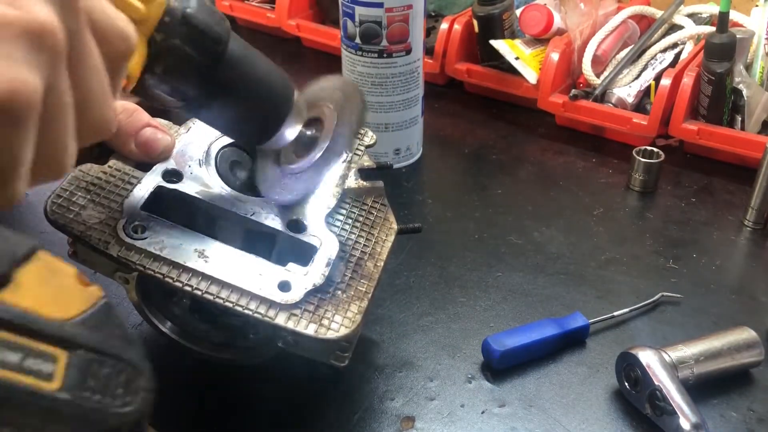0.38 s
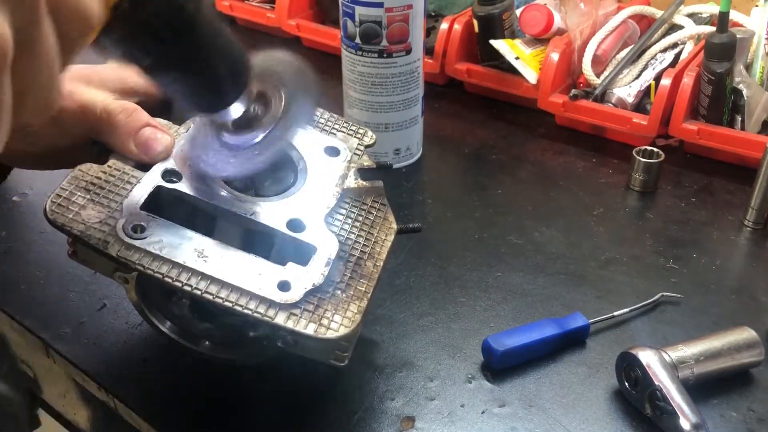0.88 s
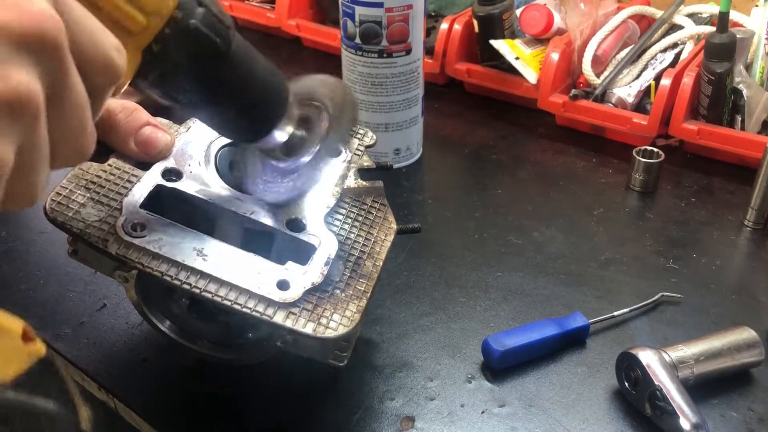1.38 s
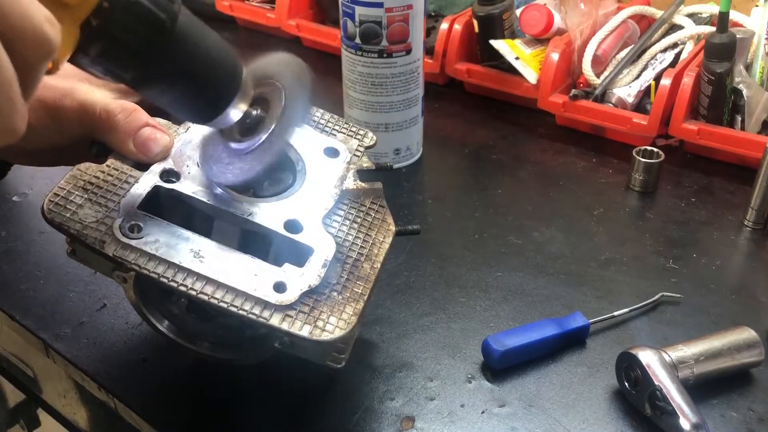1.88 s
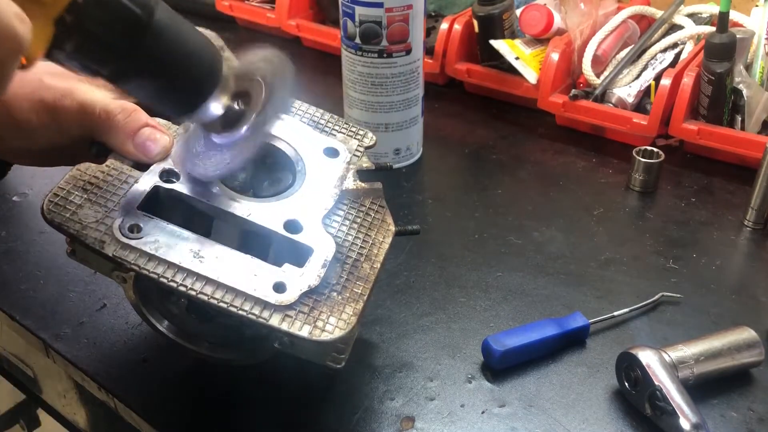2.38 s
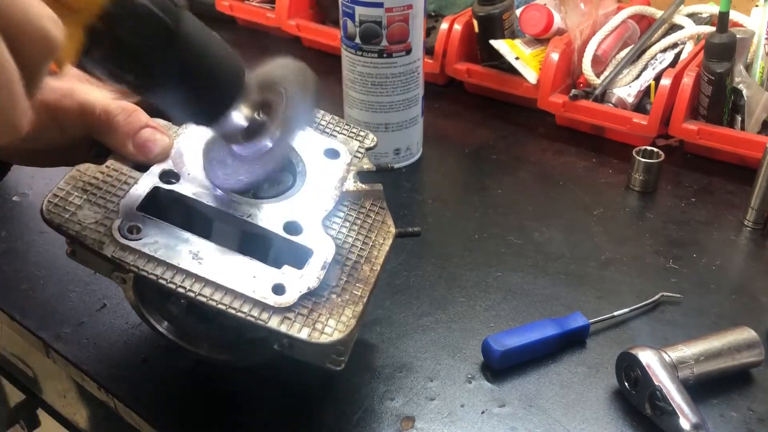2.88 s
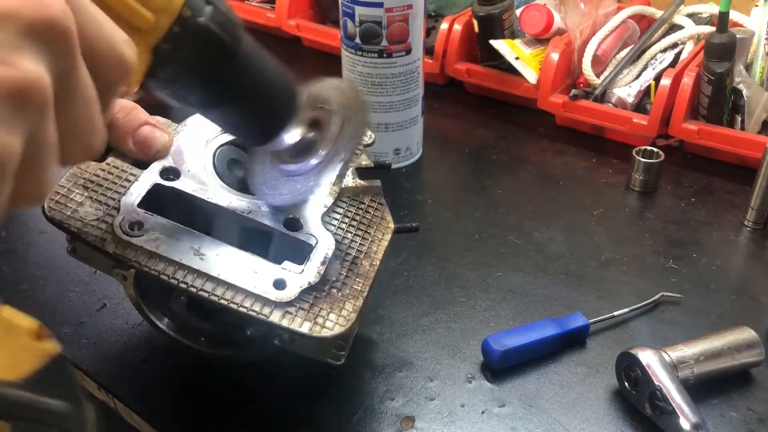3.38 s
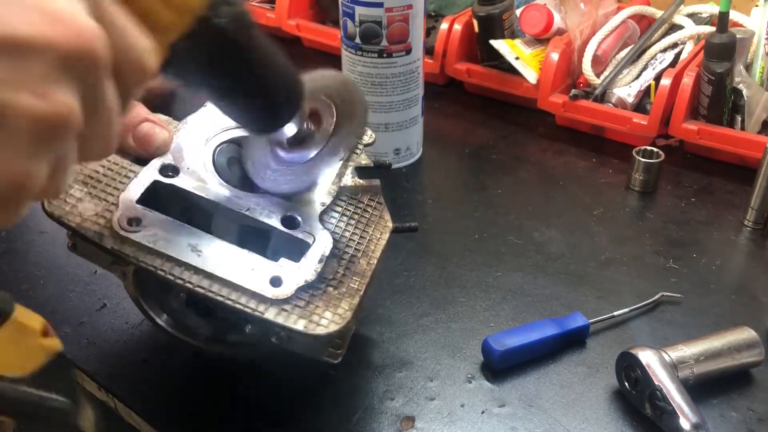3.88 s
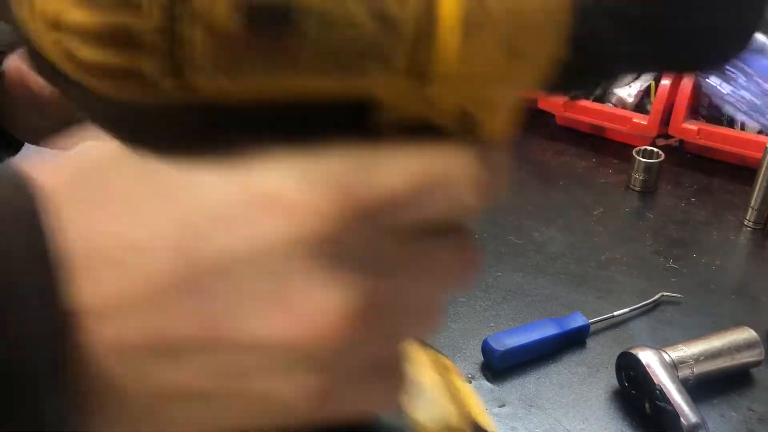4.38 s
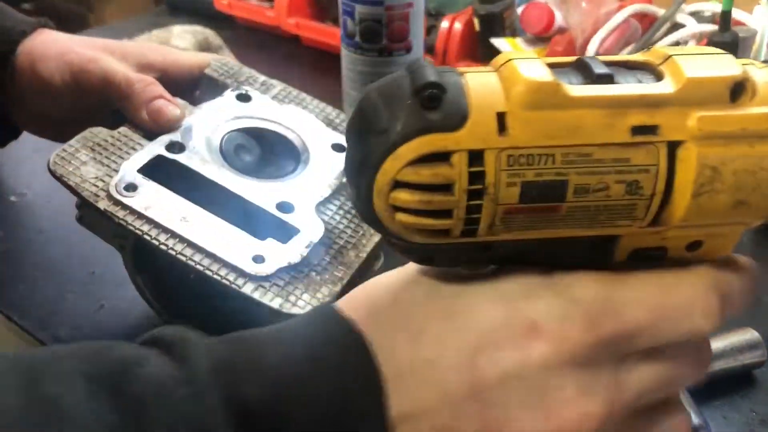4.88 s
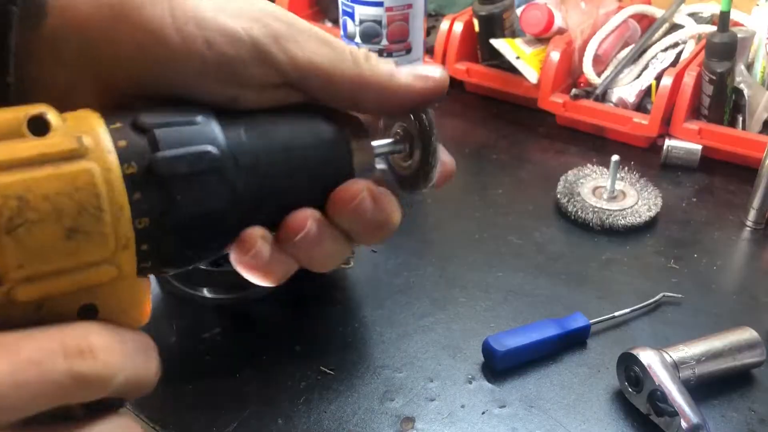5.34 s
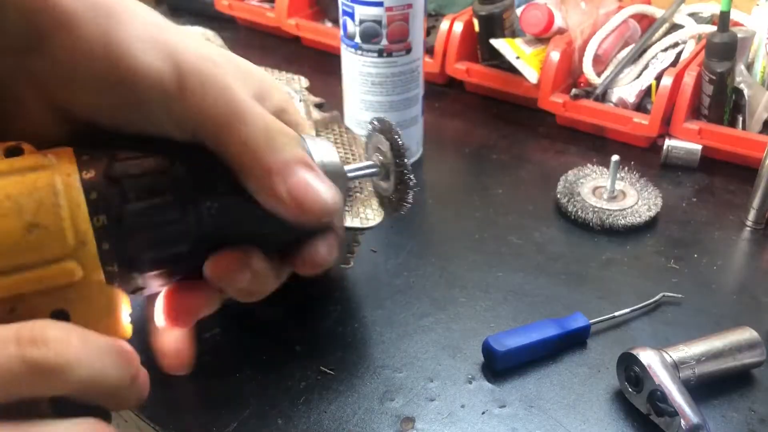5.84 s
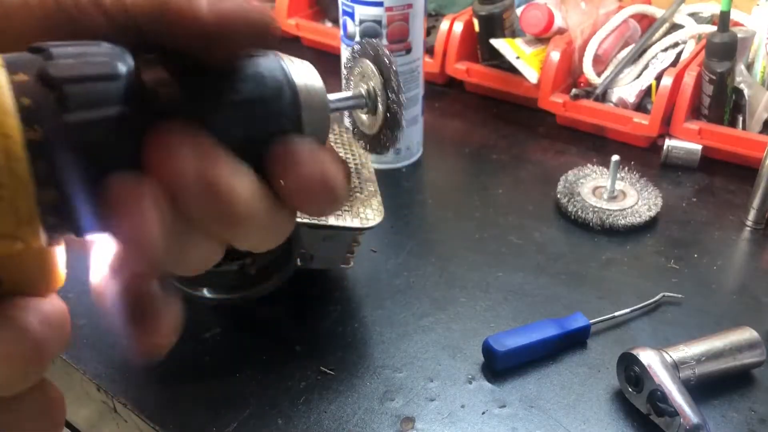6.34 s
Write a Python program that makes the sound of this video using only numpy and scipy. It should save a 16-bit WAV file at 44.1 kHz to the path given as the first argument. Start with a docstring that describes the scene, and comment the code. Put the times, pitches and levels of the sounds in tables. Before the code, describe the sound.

Close in a quiet, fairly dry workshop, a cordless drill already runs at full speed, a wire wheel rasping on a cast metal part with low thumps. It slows and brakes with clacks near one second, winds up again quickly and roars until nearly four seconds, then stops dead. Afterwards come light knocks, a brief chuck twist, sharp ratchet clicks and faint handling.

```python
"""On a workshop bench, a cordless drill spins a wire wheel on a cast part in two bursts ended by the brake.
The drill is whining sines tied to the rotor plus shaped noise: roar, hiss and a low rumble.
The part thumps on the bench as damped swings; knocks and ratchet clicks are noise bursts that ring bodies.
Grainy noise makes the hand slides and the dull tails left after the brake stop and the knocks.
A hand-spun chuck is sinking partials; all this sits in a quiet room."""
import sys
import numpy as np
from scipy import signal
from scipy.fft import rfft, irfft, next_fast_len
from scipy.io import wavfile

SR = 44100
rng = np.random.default_rng(int(sys.argv[2]) if len(sys.argv) > 2 else 0)


def ratio(d):
    """dB to gain"""
    e = np.asarray(d, float) / 20
    return 10 ** e


def materialize(psi):
    """Save the field psi as 16-bit PCM at rate SR to the path in sys.argv[1].

    A 1-D psi becomes a single channel; in a 2-D psi each row is a channel.
    """
    bounded = np.clip(np.atleast_2d(psi).T, -1, 1)
    quanta = np.round(bounded * 32767).astype(np.int16)
    wavfile.write(sys.argv[1], SR, quanta)


N = 296793   # length in samples

FULL_SPEED = 386       # rotor turns per s
CHUCK_RATIO = 15.1     # rotor turns for one chuck turn
CUTOFF_HZ = 15900      # upper edge of the sound
END_DB_PER_S = 328.5   # quick fall that ends each slide, noise tail and chuck twist


def rms_one(x):
    """Scales to rms 1."""
    return x / np.sqrt(np.mean(x ** 2) + 1e-20)


def in_time(spans):
    """Reads timed columns sample by sample, with a gate that is open only inside the spans."""
    t = np.arange(N) / SR
    s, *columns = np.transpose(np.vstack(spans))
    gate = 0
    for rows in spans:
        since_start, until_end = t - rows[0][0] + .001, rows[-1][0] - t + .004
        gate = gate + np.clip(np.minimum(since_start, until_end) / .004, 0, 1)
    return np.minimum(gate, 1), [np.interp(t, s, c) for c in columns]


def drift(rate):
    """Smooth random wandering of rms 1, made at an eighth of the sample rate; a higher rate is quicker."""
    r = np.exp(-16 * np.pi * rate / SR)
    noise = rng.standard_normal(N // 8 + 4002)
    slow = signal.lfilter([1], [1, -2 * r, r * r], noise)[4000:]   # skip the filter's start
    return np.interp(np.arange(N) / 8, np.arange(len(slow)), rms_one(slow))


def band(x, low_hz, high_hz):
    """Keeps the sound between two frequencies."""
    return signal.sosfilt(signal.butter(2, [low_hz, high_hz], "band", fs=SR, output="sos"), x)


def coloured(x, spectrum, level_low, level_high):
    """Shapes x to a spectrum; rms 1 between the two given frequencies."""
    hz, points = np.fft.rfftfreq(N, 1 / SR) + 1, np.array(spectrum)
    shaped = rfft(x) * ratio(np.interp(np.log(hz), np.log(points[:, 0]), points[:, 1]))
    inside = irfft(shaped * (hz > level_low) * (hz < level_high), N)
    return irfft(shaped, N) / np.std(inside)


def resonance(x, hz, width):
    """A body that rings at one pitch: two-pole filter, gain 1 at its peak."""
    r = np.exp(-np.pi * width / SR)
    poles = [1, -2 * r * np.cos(2 * np.pi * hz / SR), r * r]
    return signal.lfilter(np.array([1, 0, -1]) * (1 - r * r) / 2, poles, x + 1e-18)


def orders(table, turns, waver_db, waver_rate):
    """Sines at whole multiples of the rotor turns, each wavering in strength."""
    total = 0
    for multiple, db in table:
        strength = np.sqrt(2) * ratio(db + waver_db * drift(waver_rate))
        total = total + strength * np.sin(2 * np.pi * (round(multiple) * turns + rng.random()))
    return total


# how firmly the wires touch the part: (t/s, level/dB)
CONTACT = [(0, 0), (.06, -0.5), (.28, -2.5), (.35, -0.3), (.72, -0.75), (.9, 0), (1.5, 0.6), (2.6, -.5),
           (3.9, 0.5)]


def drill():
    """The rotor's speed, load and noise level drive the whines, roar, hiss and rumble together."""
    speed, sag, free, level_db = rotor()
    contact_db = in_time([CONTACT])[1][0]
    roar_db = -28.5 + contact_db + level_db
    turns = np.cumsum(speed + .5 * drift(25.0)) / SR
    tones = whines(speed, turns, roar_db, level_db) * free
    wires = bristle_strikes(sag)
    # uneven once per chuck turn (the wheel runs out of true) and once per rotor turn
    chuck_db = 0.61 * np.sin(2 * np.pi * turns / CHUCK_RATIO)
    throb = ratio(chuck_db + 0.85 * np.sin(2 * np.pi * turns) + 0.74 * drift(37.0))
    noise = roar(wires[0] * throb, wires[2], contact_db) * ratio(roar_db - 4.5)
    noise = noise + hiss(wires[1] * throb) * ratio(-27.5 + 0.53 * contact_db + level_db)
    return tones + noise + rumble(sag, turns, level_db)


# trigger pulled, trigger released, brake bites: (t/s, t/s, t/s)
RUNS = [(-1.0, 0.908, 1.102), (1.334, 3.89, 3.92)]
# rotor speed under light contact: (t/s, turns per s)
CRUISE = [(0, 378), (.28, 384.5), (.9, 385.5), (1.6, 382.3), (2.3, 383.2), (2.64, 387), (3.2, 387),
          (3.45, 384.6), (3.88, 381)]
# the wheel is pressed on the part: (t/s, sag in turns per s, lean-in time constant/s)
PRESSES = [(.356, 5, .03), (.404, 5.5, .03), (.516, 6, .09), (.72, 6, .07), (.785, 12, .08),
           (2.227, 2.2, .01), (2.776, 9.9, .039), (3.035, 13.3, .044), (3.336, 10.2, .097),
           (3.583, 8.9, .023), (3.824, 4.7, .017)]
SPIN_UP_S, RECOVER_S = .051, .049             # time constants
COAST_HZ_PER_S, BRAKE_HZ_PER_S = 415, 2500    # speed lost, in turns per s each second
LOCK_S = .014                                 # from brake bite to standstill
BITE_S, RUNDOWN_S = .018, .09                 # noise starts after the pull, ends after the lock
LOCKED_DROP_DB, RUNDOWN_DB_PER_S = 2.5, 216   # noise drop at the lock, then its fall


def rotor():
    """Speed rises to a limit, sags under load, coasts and brakes; also load sag, tone gate, noise level/dB."""
    t = np.arange(N) / SR
    sag = 0
    for s, depth, lean in PRESSES:
        sag = sag + depth * np.exp(-np.abs(t - s) / np.where(t < s, lean, RECOVER_S))
    cruise = in_time([CRUISE])[1][0] - sag
    speed, free, level_db = 0, 0, -200
    for pull, release, bite in RUNS:
        lock = bite + LOCK_S
        inside = (t > pull) & (t < lock)
        spinning_up = cruise * (1 - np.exp(-np.maximum(t - pull, 0) / SPIN_UP_S))
        coasting = spinning_up - COAST_HZ_PER_S * np.clip(t - release, 0, lock - release)
        speed = speed + inside * (coasting - BRAKE_HZ_PER_S * np.maximum(t - bite, 0))
        free = free + inside * np.clip((lock - t) / .004, 0, 1)
        # the noise follows the speed without the braking
        law_db = 20 * 0.97 * np.log10(np.clip(coasting / FULL_SPEED, .01, 1))
        locked_db = (t > lock) * (LOCKED_DROP_DB + RUNDOWN_DB_PER_S * (t - lock))
        sounding = (t > pull + BITE_S) & (t < lock + RUNDOWN_S)
        level_db = np.where(sounding, law_db - locked_db, level_db)
    return speed, sag, free, level_db


# steady rotor tones: (multiple of rotor speed, level/dB against the gear roar)
ROTOR = [(2, -18), (3, -17), (4, -20), (5, -13), (6, -16), (10, -16), (13, -12.5), (14, -17), (15, -11),
         (20, -17), (21, -13), (22, -18), (23, -18), (24, -9), (25, -18), (29, -17), (31, -18), (37, -19),
         (38, -18)]
# small-gear whine: (multiple of rotor speed, level/dB against the pinion level)
PINION = [(12, 0)]
# commutator whine: (multiple of rotor speed, level/dB against the commutator level)
COMMUTATOR = [(30, -11.5), (35, -18), (39, -20)]
# the two changing whines at full speed: (t/s, pinion level/dB, highest commutator level/dB)
WHINE = [(0, -32.5, -42), (.28, -34.5, -21), (.35, -28, -39.5), (.48, -28.5, -29.5), (.58, -32, -34),
         (.71, -25.5, -16), (.84, -31.5, -34), (.905, -18, -29.5), (.945, -26.5, -36.5), (1.1, -30, -44.5),
         (1.4, -28, -31), (1.65, -28, -21.5), (2.13, -27.5, -21), (2.26, -29, -33.5), (2.4, -28.5, -21.5),
         (2.65, -30, -21), (2.9, -27.5, -25.5), (3.2, -31, -24), (3.45, -31, -23), (3.6, -29, -17.5),
         (3.9, -26.5, -16.5)]


def whines(speed, turns, roar_db, level_db):
    """Gear and commutator sines glide with the rotor and weaken as it slows."""
    pinion_db, top_db = in_time([WHINE])[1]
    fullness = np.clip(speed / FULL_SPEED, 0, 1)
    steady = fullness * orders(ROTOR, turns, waver_db=2.5, waver_rate=25.0)
    unbalance_hum = fullness ** 7 * orders([(1, -9.5)], turns, waver_db=1.2, waver_rate=8.0)
    pinion = fullness * orders(PINION, turns, waver_db=1.0, waver_rate=60.0)
    # the highest commutator order sings only near full speed, where it meets a resonance of the casing
    highest = fullness ** 40 * orders([(40, 0)], turns, waver_db=1.5, waver_rate=30.0)
    commutator = fullness ** 2 * orders(COMMUTATOR, turns, waver_db=3.0, waver_rate=20.0)
    tones = ratio(roar_db) * (steady + unbalance_hum) + ratio(pinion_db + level_db) * pinion
    return tones + ratio(top_db + level_db) * highest + ratio(-22.5 + level_db) * commutator


def bristle_strikes(sag):
    """Three noises of bristle strikes, more uneven in size as the load slows the rotor."""
    uneven_db = (1.5 + 0.2628 * sag) * rng.standard_normal((3, N))
    return rng.standard_normal((3, N)) * ratio(uneven_db)


# colour of the roar: (f/Hz, level/dB)
ROAR = [(200, -26.5), (330, -15), (440, -13.5), (530, -11.5), (700, -8), (1100, -5.5), (1500, -5),
        (2000, -9), (2700, -9), (4000, -8.5), (5000, -16), (6000, -20.5), (8000, -33)]
# rubbed part rings: (f/Hz, width/Hz, relative level/dB)
CASTING = [(1059.4, 13, 0.5), (1262, 9.8, -7), (1608, 30, -3.5), (2008, 140, 1.5), (5600, 150, -18.5),
           (6380, 89, -1.5)]


def roar(strikes, rubbing, contact_db):
    """Coloured strike noise, plus the cast part's resonances rung harder by firmer contact."""
    ringing = 0
    for hz, width, db in CASTING:
        ringing = ringing + ratio(db + 2.5 * drift(5.0)) * rms_one(resonance(rubbing, hz, width))
    return coloured(strikes, ROAR, level_low=500, level_high=1800) + ringing * ratio(-8.0 + 1.5 * contact_db)


# colour of the brush and fan hiss: (f/Hz, level/dB)
HISS = [(3000, -34.5), (5000, -0.5), (6600, -9), (7600, 0), (8600, 0.5), (10000, -2.5), (11500, -5),
        (12800, -6), (13800, -5), (14500, -0.5), (15000, 2.5), (15700, -2), (16000, -12.5)]


def hiss(strikes):
    """Brush and fan hiss: the uneven noise shaped to a bright spectrum."""
    return coloured(strikes, HISS, level_low=6000, level_high=11000)


def rumble(sag, turns, level_db):
    """Low noise of the bench, which shakes on after a press and throbs once per chuck turn."""
    lag = np.exp(-1 / (0.45 * SR))   # 0.45 s time constant
    shake = signal.lfilter([1 - lag], [1, -lag], sag)
    low = rms_one(band(band(rng.standard_normal(N), 69, 190), 45, 260))
    throb_db = 4.6 * drift(11.0) + np.sin(2 * np.pi * turns / CHUCK_RATIO)
    return low * ratio(throb_db) * ratio(-50 + 1.41 * shake + level_db)


# part rocking on the bench: (t/s, level/dB of the low swing before its decay, f/Hz, time to fall 60 dB/s)
THUMPS = [(0.216, -23.5, 59.2, 0.069), (0.237, -19, 142, 0.067), (0.303, -33, 116, 0.15),
          (0.333, -11.5, 115, 0.034), (0.358, -11.5, 86.1, 0.029), (0.391, -8, 76.3, 0.044),
          (0.463, -17.5, 99, 0.072), (0.544, -22, 81, 0.047), (0.707, -9, 105, 0.044),
          (0.727, -18.5, 75.4, 0.079), (0.81, -27, 64.6, 0.066), (0.935, -25.5, 267, 0.07),
          (0.94, -19.5, 51.4, 0.069), (0.956, -16.5, 57.2, 0.047), (1.282, -39, 119, 0.051),
          (1.407, -25, 148.7, 0.063), (1.667, -25, 78, 0.12), (2.814, -20.5, 250, 0.03),
          (2.828, -16.5, 161, 0.044), (3.03, -20.5, 200, 0.032), (3.06, -13, 113, 0.037),
          (3.339, -25, 238, 0.045), (3.347, -32.5, 113.4, 0.12), (3.929, -22.5, 178, 0.058),
          (5.146, -23, 118.6, 0.13)]


def thumps():
    """A dull push: a damped low swing with a quicker overtone."""
    out, t = np.zeros(N + SR), np.arange(SR // 3) / SR
    for s, db, hz, t60 in THUMPS:
        overtone = 1.9 * ratio(-160 * t / t60) * np.sin(2 * np.pi * 2.6 * hz * t)
        swing = np.sin(2 * np.pi * hz * t) + overtone
        out[round(s * SR):][:len(t)] += ratio(db - 60 * t / t60) * np.minimum(t / 0.0046, 1) * swing
    return out[:N]


# brake, trigger, knocks and ratchet, as sent into the bodies:
# (t/s, low level/dB, middle level/dB, high level/dB, rattle's time to fall 60 dB/s)
CLICKS = [(1.034, -41, -18, -26.5, 0.018), (1.105, -32.5, -25, -24.5, 0.032),
          (1.116, -34, -14.5, -14, .024), (1.157, -38, -24.5, -20, .03), (1.173, -46, -25.5, -23.5, 0.042),
          (1.343, -29.5, -20, -18, .03), (1.351, -38, -43, -32.5, .02), (3.94, -35.5, -17.5, -16.5, 0.038),
          (3.954, -39.5, -23, -11.5, .026), (3.958, -42.5, -15.5, -25, 0.034),
          (3.985, -46.5, -30, -26, .022), (3.996, -64.5, -31, -29.5, 0.043), (4.299, -66, -67, -60, 0.05),
          (4.583, -28, -23.5, -29.5, .028), (4.585, -18.5, -36, -31, 0.05), (4.68, -28.5, -48, -33, 0.046),
          (4.734, -56, -37, -27.5, 0.041), (4.802, -47, -43.5, -44, .032), (4.9, -68, -57, -47, .043),
          (4.917, -55.5, -60, -49.5, .065), (4.972, -60, -62, -57, .04), (5.056, -72, -74, -64, .035),
          (5.094, -64, -47, -46, 0.029), (5.135, -27.5, -42, -60, 0.044), (5.152, -30.5, -72, -64, 0.019),
          (5.258, -53, -34.5, -27.5, 0.16), (5.398, -68.5, -47.5, -35, 0.034),
          (5.4387, -60.5, -36.5, -23.5, 0.04), (5.442, -51, -26.5, -8, 0.045),
          (5.453, -58, -30.5, -18.5, 0.023), (5.468, -61, -30.5, -20, 0.028),
          (5.675, -78, -49.5, -72, 0.033), (5.788, -52, -32.5, -39, 0.049), (5.832, -76, -72, -68, .03),
          (5.869, -90, -73, -40.5, .03), (5.943, -67.5, -56.5, -51, .035), (6.013, -71, -37.5, -62.5, .023),
          (6.056, -49, -44, -11.5, 0.015), (6.084, -46, -30, -9.5, 0.017), (6.099, -49, -44, -23, 0.038),
          (6.124, -52.5, -32, -11.5, 0.019), (6.347, -55, -57, -55, 0.033), (6.374, -65, -52, -63, 0.025),
          (6.41, -53, -45, -42.5, 0.073), (6.423, -66, -50, -40.5, 0.026)]


def clicks():
    """Each contact gathers for a moment, cracks, and dies in a rattle."""
    drive, t = np.zeros((3, N + SR)), np.arange(SR // 5) / SR - .003
    for s, low_db, middle_db, high_db, t60 in CLICKS:
        crack = ratio(-60 * np.abs(t) / np.where(t < 0, .0015, .004))
        rattle = 0.34 * (t > 0) * ratio(-60 * t / t60)
        noise = rng.standard_normal((3, len(t)))
        burst = np.tanh(3 * noise) * crack + noise * rattle   # tanh limits the crack's height
        burst[0] = crack + ratio(9.0) * noise[0] * rattle   # the bench feels one push
        levels = ratio(np.array([[low_db], [middle_db], [high_db]]))
        drive[:, round(s * SR):][:, :len(t)] += levels * burst
    return bodies(*drive[:, :N])


# bench resonances: (f/Hz, relative level/dB, ring setting/s: the width in Hz is 3 over this)
BENCH = [(180, -9, 0.082), (244, -12.5, .07), (325.2, 0.5, 0.13), (442, 2, 0.058), (502, -5.5, 0.089),
         (640, 5.5, 0.043), (785, -2, 0.17), (1064, -8, 0.044), (1340, -2, 0.053), (1980, -13.5, 0.023)]
# plastic housing and chuck resonances: (f/Hz, width/Hz, relative level/dB)
HOUSING = [(2710, 42, 2.5), (5260, 840, 10), (7200, 160, -3.5), (8600, 21, 0.5), (8440, 140, -8.5),
           (9300, 150, -13.5), (10700, 270, -20), (11900, 240, -3.5), (13300, 420, -18.5)]


def bodies(low, middle, high):
    """Lows ring the bench, the rest the plastic housing and chuck."""
    bench, housing = 0, 0
    high_part = band(band(high, 3900, CUTOFF_HZ), 2800, 0.98 * CUTOFF_HZ)
    shell = band(middle, 580, 3500) * ratio(15.5) + high_part * ratio(6.0)
    for k, (hz, db, ring) in enumerate(BENCH):   # neighbours get opposite signs
        bench = bench + ratio(db) * resonance(low, hz, 3.0 / ring) * (-1) ** k
    for k, (hz, width, db) in enumerate(HOUSING):
        housing = housing + ratio(db) * resonance(shell, hz, width) * (-1) ** k
    return ratio(21.5) * bench + ratio(17.0) * band(low, 260, 990) + ratio(-1.4) * shell + ratio(-4.0) * housing


# hand slides, and the dull noise tails left after the brake stop and the knocks; relative levels before fading:
# (t/s, length/s, low level/dB, middle level/dB, high level/dB)
STROKES = [(1.18, 0.0499, -59, -49, -54), (1.268, .08, -61, -60, -54), (4.007, .04, -62, -49, -54),
           (4.04, .12, -66, -63.5, -72.5), (4.598, 0.027, -37, -65, -61.5), (4.703, 0.08, -35, -46.5, -40),
           (4.91, 0.017, -58, -79, -79), (5.16, 0.038, -41.5, -83, -85), (5.256, 0.076, -41, -35, -32.5),
           (5.428, .02, -59, -58, -42.5), (5.731, 0.041, -81.5, -74, -62), (5.86, .08, -79, -80, -65),
           (5.47, 0.053, -71.5, -70, -51.5), (5.78, 0.025, -73, -56, -53.5), (5.935, .02, -62, -68, -57),
           (5.969, 0.0705, -57, -54, -66), (6.015, 0.023, -63, -62, -58.5), (6.067, 0.047, -44, -61.5, -30),
           (6.124, 0.059, -72, -70, -52.5), (6.31, .02, -83.5, -76.5, -60), (6.333, 0.012, -61, -70.5, -50),
           (6.406, 0.0094, -67, -68, -73)]
# faint steady handling: relative level/dB of low, middle and high
RUSTLE_DB = [-71.5, -86.5, -75.5]
# chuck sleeve rings: (f/Hz, width/Hz, relative level/dB)
SLEEVE = [(1930, 93, -18), (2570, 66, -3), (3230, 80, -8.5), (3370, 38, -7), (5030, 39, -9.5),
          (6250, 73, -9), (6800, 42, -9.5)]
RISE_S, FADE_DB_PER_S = 0.018, 42.5   # rise time of a slide or tail, fall during it


def slides_and_tails():
    """Hand slides and dull noise tails: dense uneven grains in three bands, which also ring the chuck sleeve."""
    t = np.arange(N) / SR
    levels = ratio(np.array(RUSTLE_DB)[:, None]) * np.ones(N)
    for s, length, *db in STROKES:
        fade_db = FADE_DB_PER_S * np.clip(t - s, 0, length)
        end_db = END_DB_PER_S * np.maximum(t - s - length, 0)
        swell = ratio(np.array(db)[:, None] - fade_db - end_db)
        levels = levels + swell * np.clip((t - s) / RISE_S, 0, 1)
    unevenness = ratio(1.8 * drift(150.0) + 2.4 * rng.standard_normal(N))
    grains = rng.standard_normal((3, N)) * unevenness
    edges_hz = [(200, 900), (900, 3500), (3500, 15500)]
    grainy = ratio(-4.0) * sum(level * rms_one(band(g, *edge)) for level, g, edge in zip(levels, grains, edges_hz))
    sleeve = sum(ratio(db) * resonance(grainy, hz, width) for hz, width, db in SLEEVE)
    return grainy + ratio(-2.0) * sleeve


# a brief squeak: (t/s, f/Hz, level/dB)
SQUEAK = [(5.893, 1940, -75), (5.905, 2070, -60), (5.922, 2300, -70.5)]


def squeak():
    """One sine whose pitch and level follow the table."""
    gate, (hz, db) = in_time([SQUEAK])
    return gate * ratio(db) * np.sin(2 * np.pi * np.cumsum(hz) / SR)


# hum while the bench is leaned on: (t/s, level/dB)
HUM = [(3.97, -48.5), (4.316, -66.5), (4.4, -67), (4.618, -64), (4.83, -54.5), (5.068, -61), (5.168, -39),
       (5.308, -73), (5.4, -78.5)]


def bench_hum():
    """Noise through two equal narrow resonances swells as a low hum while the bench is leaned on."""
    gate, (db,) = in_time([HUM])
    hum_hz = 73.4
    hum = resonance(resonance(rng.standard_normal(N), hum_hz, 32.0), hum_hz, 32.0)
    return gate * ratio(db) * rms_one(hum)


# the chuck is spun by hand: one row (t/s, length/s, level/dB)
TWIST = (5.26, 0.06, -43.5)
# its partials: (starting f/Hz, relative level/dB)
TWIST_RINGS = [(620, -1), (1400, 0.5), (2300, -7), (3000, 3), (3700, -9)]


def twist():
    """The hand-spun chuck slows: rough whirring partials that sink together."""
    s, length, db = TWIST
    t = np.clip(np.arange(N) / SR - s, 0, 2 * length)
    fade = ratio(db - END_DB_PER_S * np.maximum(t - length, 0))
    shape = np.clip(t / .005, 0, 1) * fade * (t < 2 * length)
    cycles = t - 2.3 * t * t / 2   # pitch falls by 2.3 times its start per second
    whirr = sum(ratio(part_db) * drift(81.0) * np.sin(2 * np.pi * hz * cycles) for hz, part_db in TWIST_RINGS)
    return shape * whirr


def room(x):
    """Echoes from ten feedback delays, duller on every round, summed on a frequency grid."""
    size = next_fast_len(N + SR)
    w = 2 * np.pi * np.fft.rfftfreq(size, 1 / SR)
    t60 = 0.23 / np.sqrt(1 + (w / (2 * np.pi * 4100)) ** 2)   # 0.23 s in the bass, shorter toward the treble
    echoes = 0
    for k, lag in enumerate(rng.uniform(.008, .035, size=10)):
        loop = ratio(-60 * lag / t60) * np.exp(-1j * w * lag)
        echoes = echoes + loop / (1 - loop) * (-1) ** k
    return irfft(rfft(x, size) * echoes, size)[:N]


# colour of the quiet room: (f/Hz, relative level/dB per Hz)
ROOM_TONE = [(15, -64), (25, -28.5), (70, -2), (141, -4), (206, -10), (249, -14.5), (285, -15),
             (607, -23.5), (659, -18.5), (1100, -30), (16000, -48)]


def room_tone():
    """Steady faint noise shaped to the room's mostly low spectrum."""
    return ratio(-63) * coloured(rng.standard_normal(N), ROOM_TONE, level_low=19, level_high=16000)


def scene():
    """Close sounds with their echoes, the thumps and the room tone, the same in both channels."""
    near = drill() + clicks() + slides_and_tails() + squeak() + bench_hum() + twist()
    mono = near + ratio(-19) * room(near) + thumps() + room_tone()
    return np.array([mono, mono])


def low_pass(x):
    """Removes everything above the highest recorded frequency."""
    return signal.sosfilt(signal.butter(12, 17000, fs=SR, output="sos"), x)


def record(dry):
    """The microphone drops the deepest bass and rounds the peaks; the top is cut."""
    dry = signal.sosfilt(signal.butter(2, 32, "high", fs=SR, output="sos"), dry)
    rounded = .85 * np.tanh(dry / .85)
    cut = signal.sosfilt(signal.cheby2(14, 30, CUTOFF_HZ, fs=SR, output="sos"), rounded)
    return low_pass(cut)


dry = scene()
out = record(dry)
materialize(out)
```